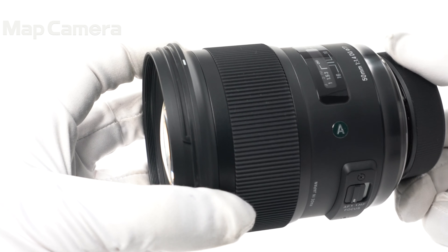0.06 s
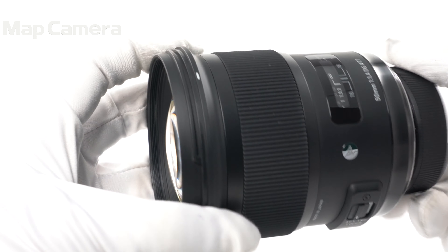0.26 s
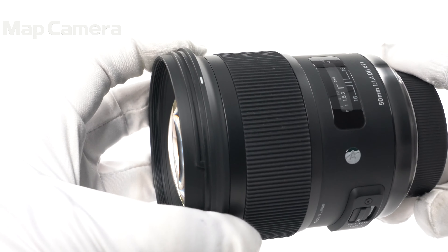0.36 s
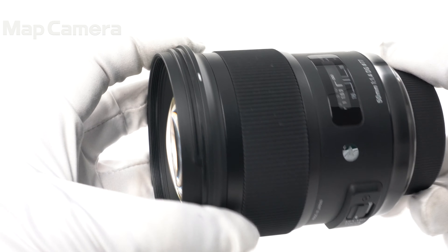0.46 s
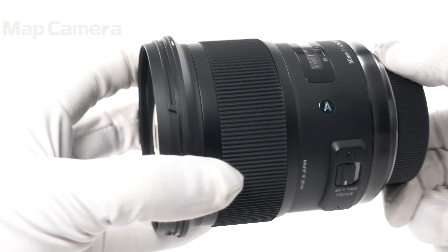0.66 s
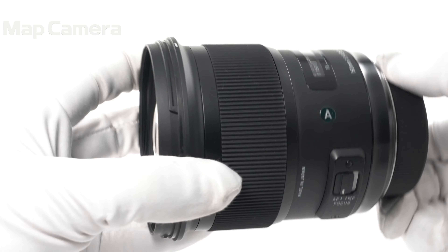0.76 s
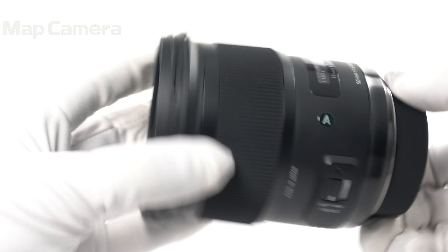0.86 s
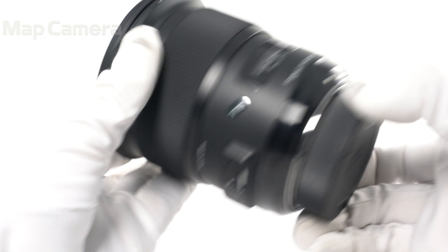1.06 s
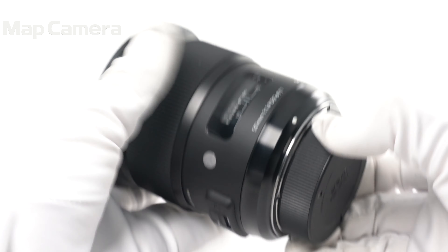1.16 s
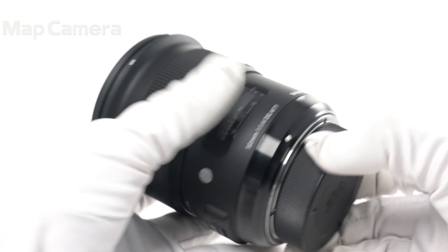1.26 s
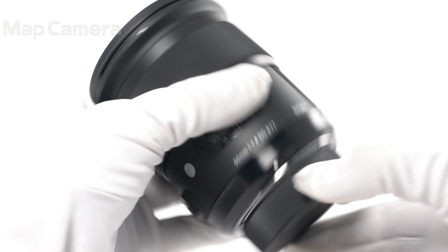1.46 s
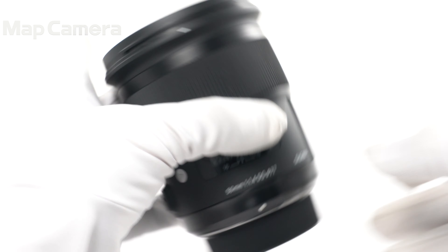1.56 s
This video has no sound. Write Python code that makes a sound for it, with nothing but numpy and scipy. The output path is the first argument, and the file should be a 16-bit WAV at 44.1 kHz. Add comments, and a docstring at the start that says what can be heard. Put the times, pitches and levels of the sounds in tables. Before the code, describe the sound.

Hard plastic clack of a cap on a camera lens, followed by faint sliding and cloth brushing

```python
"""Turning a camera lens over in gloved hands

Close by in a quiet, dry room, a plastic part, probably the rear cap, scrapes round, snaps over its catch,
knocks into its seat and slides on to a soft stop: decaying modes make the impacts, stick-slip noise the slides.
Cotton gloves brush the barrel (uneven filtered noise) and the hands bump it dully (damped low sines).
Underneath lie a low room rumble, a wavering hum and a thin electrical whine."""
import sys
import numpy as np
from scipy import signal
from scipy.fft import rfft, irfft, next_fast_len
from scipy.io import wavfile
from scipy.ndimage import uniform_filter1d, map_coordinates

SR = 44100
rng = np.random.default_rng(int(sys.argv[2]) if len(sys.argv) > 2 else 0)


def transcribe(u):
    """Save the signal u as a 16-bit wav file named by the first command-line argument.

    u: samples, shape (n,) or (channels, n), limited to [-1, 1]; the rate is SR.
    q: integer samples, one column per channel.
    """
    v = np.clip(np.atleast_2d(u).T, -1, 1)
    q = np.round(v * 32767).astype(np.int16)
    wavfile.write(sys.argv[1], SR, q)


N = 70560

# Modes of the lens and cap, with relative levels for three places of impact:
# (frequency [Hz], decay time T60 [s], level at catch [dB], level at seat [dB], level at stop [dB])
LENS_MODES = [(269, 0.05, -26, -10, -18), (543, 0.022, -30, -5.5, -19), (964, 0.067, -21, -26, -2.5),
              (1176, 0.055, -20, -5, -10), (1557, 0.036, -7, -2, -10), (1835, 0.019, 2.5, -1, -14),
              (2379, 0.04, -10.5, -3.5, 0), (2744, 0.041, -0.5, -10, -7), (2966, 0.023, -12.5, 1, -22),
              (3150, 0.055, -13, -9.5, -6), (4363, 0.028, -1.5, -23, -23), (4802, 0.028, -0.5, 1, -9),
              (6200, .025, -4, -6.5, -6.5), (8480, 0.027, -3, -9, -18)]
# Spectrum of the dense wash of small modes:
# (frequency [Hz], gain at catch [dB], gain at seat [dB], gain at stop [dB])
WASH_SPECTRA = [(119.9, -14.5, -3.5, -11), (825, -13.5, -8, -4.5), (1270, -20.5, -0.5, -9.5),
                (1680, 7, -15, -2), (2610, -1.5, 10, 6), (3420, -8, -0.5, -7), (4410, 4, -2.5, -8),
                (8640, -4, -10, -11), (10550, -12, -9, -18.5), (15900, -22, -20, -30)]
# Bare pressure pulse of a contact, relative: level [dB] at the catch, the seat and the stop
PUSH_LEVELS = [4, 12, 7.5]
# Snaps at the catch: (time [s], level [dB], bass tilt [dB/octave], treble tilt [dB/octave])
CATCH_SNAPS = [(.1583, -41, -6, -1.5), (.1895, -38, 1, -5.5), (.1958, -33.5, -15, 3.5),
               (.2298, -16.5, -18, 0.5), (.2311, -6, -1, -4), (.2378, -16.5, -2.5, -8),
               (.2617, -31.5, 4.5, 8), (.2995, -40.5, -4, 11.5), (.3045, -27, 0.5, -5.5)]
# Knocks into the seat: (time [s], level [dB], bass tilt [dB/octave], treble tilt [dB/octave])
SEAT_KNOCKS = [(.3065, -28.5, -17, 2), (.3187, -22, 0, -9.5), (.3226, -15, -2, 2.5),
               (.3256, -8.5, 0.5, 0.5), (.3295, -17.5, -0.5, 4)]
# Soft taps that ring as at the stop: (time [s], level [dB], bass tilt [dB/octave], treble tilt [dB/octave])
STOP_TAPS = [(.675, -26, 1, -1.5), (.6788, -27, -0.5, 0.5), (.6835, -32.5, 1.5, 3), (.764, -49, -4, -2),
             (.897, -49, 6, 2)]
# Side signal of the snaps and knocks relative to their mid: (frequency [Hz], level [dB])
CLICK_WIDTH = [(3000, -53), (5500, -31), (7500, -15.5), (10000, -21)]
# First turn, scraping by the catch: (time [s], level [dB])
SCRAPE_LEVEL = [(.03, -81), (.075, -59), (.135, -70), (.17, -41.5), (.18, -40), (.197, -31), (.209, -44),
                (.223, -40.5), (.24, -46), (.26, -46.5), (.275, -51), (.282, -43), (.295, -53.5),
                (.306, -32), (.316, -47), (.365, -80)]
# Second turn, sliding to the stop: (time [s], level [dB])
SLIDE_LEVEL = [(.46, -94), (.49, -51), (.53, -53), (.58, -53), (.62, -47.5), (.67, -54.5), (.695, -50),
               (.715, -82.5)]
# Scuff as the second turn breaks loose: (time [s], level [dB])
SCUFF_LEVEL = [(.48, -73), (.488, -43.5), (.507, -43.5), (.53, -71)]
# Resonances excited by the scrape: (frequency [Hz], width [Hz], gain [dB])
SCRAPE_RESONANCES = [(1480, 2500, -9), (2700, 280, -9), (4830, 330, 2), (6450, 1300, -3),
                     (7860, 1060, -7.5)]
# Resonances excited by the slide: (frequency [Hz], width [Hz], gain [dB])
SLIDE_RESONANCES = [(1540, 510, -3.5), (2000, 690, -6), (2425, 195, 3.5), (2680, 280, 0)]
# Resonances excited by the scuff: (frequency [Hz], width [Hz], gain [dB])
SCUFF_RESONANCES = [(1080, 380, -4.5), (1550, 280, 0), (2490, 560, -8.5)]
# Hiss of the sliding contact itself: (frequency [Hz], gain [dB])
CONTACT_HISS = [(300, -12.5), (2000, -6), (3500, 0.5), (6500, -1.5), (9000, -2.5), (15000, -14)]
# Gloves brushing the barrel: (time [s], level [dB])
BRUSH_LEVEL = [(.68, -83.5), (.72, -66.5), (.766, -53.5), (.796, -73), (.814, -58), (.842, -64.5),
               (.878, -49.5), (1.0, -47.5), (1.13, -48.5), (1.16, -45.5), (1.206, -52.5), (1.25, -51.5),
               (1.35, -54), (1.42, -51.5), (1.512, -44), (1.575, -49.5), (1.6, -50.5)]
# Colour of cotton on the barrel: (frequency [Hz], gain [dB])
CLOTH_SPECTRUM = [(180, -34), (300, -21.5), (590, -1.5), (1220, -3.5), (1810, -2), (3280, -3), (6900, -8),
                  (15500, -19)]
# Resonance of the brushed barrel: (frequency [Hz], width [Hz], gain [dB])
BARREL_RESONANCE = [(1835, 99, 0)]
# A thumb stroking the ribbed focus ring: (time [s], level [dB])
RIBS_LEVEL = [(.9, -73), (.97, -53), (1.1, -51.5), (1.155, -55), (1.19, -81)]
# Resonances of the ribs: (frequency [Hz], width [Hz], gain [dB])
RIBS_RESONANCES = [(3500, 1400, 0), (6400, 1200, -1)]
# Treble of the cloth: (time [s], level [dB])
FIZZ_LEVEL = [(.85, -73), (.88, -54), (1.13, -54.5), (1.155, -44.5), (1.185, -48.5), (1.21, -57),
              (1.42, -70), (1.57, -60), (1.6, -44)]
# Colour of that treble: (frequency [Hz], gain [dB])
FIZZ_SPECTRUM = [(2000, -34), (7000, 3), (10500, 3.5), (15500, -7)]
# Soft bumps of the hands: (time [s], level [dB], frequency [Hz])
HAND_BUMPS = [(0.487, -32, 216), (0.514, -31.5, 88), (0.566, -37, 123), (.71, -33, 78), (1.178, -30, 66),
              (1.237, -33, 245), (1.258, -34, 79), (1.296, -36.5, 176), (1.311, -30, 225),
              (1.393, -33.5, 200), (1.406, -30.5, 166), (1.428, -39, 61.7)]
# Dull rub of the grip: (time [s], level [dB])
GRIP_LEVEL = [(0, -59), (.13, -62), (.19, -46.5), (.3, -55), (.47, -63), (.52, -44.5), (.57, -32.5),
              (.625, -41.5), (.67, -60), (.84, -69), (1.14, -54.5), (1.6, -53)]
# Colour of the grip: (frequency [Hz], gain [dB])
GRIP_SPECTRUM = [(25, -27.5), (70, 3.5), (130, -3.5), (220, -7.5), (350, -6.5), (560, -14.5), (900, -28),
                 (2000, -60)]
# Colour of the room noise: (frequency [Hz], gain [dB])
ROOM_SPECTRUM = [(18, -14), (30, -8), (39, 6.5), (55, 0), (90, 0), (150, -6.5), (300, -9.5), (600, -22),
                 (1000, -26.5), (2500, -30), (15500, -46)]

PIVOT_HZ = 3580  # the tilts turn about this frequency
# wash and crack: levels relative to the modes, and decay times
WASH_DB, WASH_T60_S, CRACK_DB, CRACK_T60_S = -1, 0.043, 3, 0.0088
ATTACK_S = 0.00017
BUMP_CYCLES, BUMP_RISE_S = 8.8, 0.0025  # cycles for a 60 dB decay; time constant of the rise
ROOM_DB, HUM_HZ, HUM_DB, WHINE_HZ, WHINE_DB = -49.5, 78, -50, 13765, -75.5  # levels are rms
TOP_HZ, CEILING = 16100, .88  # band limit; clipping amplitude


def ring(place):
    """Modal impact at the catch (0), seat (1) or stop (2): a pulse excites modes, a wash and a crack."""
    t = np.arange(SR // 8) / SR
    modes = np.zeros(len(t))
    for k, (hz, t60, *levels) in enumerate(LENS_MODES):
        decay = amp(levels[place] + rng.normal(0, 1) - 60 * t / t60)
        modes += decay * np.sin(2 * np.pi * hz * t) * (-1) ** k  # alternating polarity
    spectrum = [(hz, gains[place]) for hz, *gains in WASH_SPECTRA]
    wash_decay = amp(WASH_DB - 60 * t / WASH_T60_S)
    crack_decay = amp(CRACK_DB - 60 * t / CRACK_T60_S)
    wash = noise(spectrum, size=len(t)) * (wash_decay + crack_decay)
    push = coloured(1.0 * (t == 0), lambda hz: along(spectrum, hz))
    push *= amp(PUSH_LEVELS[place]) / np.abs(push).max()
    return ((modes + wash) * (1 - np.exp(-t / ATTACK_S)) + push) / 2


def clicks(table, place):
    """Impact excitation: each contact rings the lens, and its hardness tilts the bass and the treble."""
    out = np.zeros(N + SR)
    for start, db, bass_db, treble_db in table:
        def tilt(hz):
            octaves = np.clip(np.log2((hz + 1) / PIVOT_HZ), -3, 1.5)
            return np.where(octaves < 0, -bass_db, treble_db) * octaves

        hit = coloured(ring(place), tilt)
        out[round(start * SR):][:len(hit)] += amp(db) * hit
    return out[:N]


def friction(curve, resonances, grain_db, hiss_db):
    """Stick-slip friction: uneven slips of plastic on the mount ring the parts and hiss at the contact."""
    releases = slips(grain_db)
    ringing = patchy(resonant(releases, resonances), depth_db=3.5)
    hiss = unit(coloured(releases, lambda hz: along(CONTACT_HISS, hz)))
    return level(curve) * (ringing + amp(hiss_db) * hiss)


def scuff():
    """Break-away friction: very uneven slips ring the cap as the second turn breaks loose."""
    return level(SCUFF_LEVEL) * resonant(slips(grain_db=7), SCUFF_RESONANCES)


def gloves():
    """Fibre friction: many small slips of cotton brush the faintly ringing barrel, stroke ribs and fizz."""
    cloth = coloured(slips(grain_db=1.5), lambda hz: along(CLOTH_SPECTRUM, hz))
    cloth = patchy(cloth, depth_db=0.95)
    barrel = resonant(rng.standard_normal(N), BARREL_RESONANCE)
    ribs = patchy(resonant(slips(grain_db=2), RIBS_RESONANCES), depth_db=3.0)
    fizz = unit(coloured(slips(grain_db=1.0), lambda hz: along(FIZZ_SPECTRUM, hz)))
    brush = level(BRUSH_LEVEL) * (cloth + amp(-14.0) * barrel)
    return brush + level(RIBS_LEVEL) * ribs + level(FIZZ_LEVEL) * fizz


def handling():
    """Damped oscillation: the hands bump the heavy lens, and the grip rubs as dull noise."""
    bumps = np.zeros(N + SR)
    t = np.arange(SR // 5) / SR
    for start, db, hz in HAND_BUMPS:
        envelope = amp(db - 60 * t * hz / BUMP_CYCLES) * (1 - np.exp(-t / BUMP_RISE_S))
        bumps[round(start * SR):][:len(t)] += envelope * np.sin(2 * np.pi * hz * t)
    return bumps[:N] + level(GRIP_LEVEL) * noise(GRIP_SPECTRUM)


def room():
    """Stationary background: rumble and faint hiss, a hum wavering in phase and level, a steady whine."""
    t = np.arange(N) / SR
    hum = np.sin(2 * np.pi * HUM_HZ * t + 1.56 * wobble(9.46))  # phase wander in radians
    hum *= amp(2.3 * wobble(8.15))
    whine = np.sin(2 * np.pi * WHINE_HZ * t)
    return amp(ROOM_DB) * noise(ROOM_SPECTRUM) + amp(HUM_DB) * unit(hum) + amp(WHINE_DB) * unit(whine)


def slips(grain_db):
    """Stick-slip: noise whose fast random level stands for tiny releases of uneven size."""
    return rng.standard_normal(N) * amp(grain_db * wobble(1500))


def resonant(x, resonances):
    """Forced resonance: x through parallel squared band-pass responses, scaled to rms 1."""
    m = next_fast_len(N + SR // 4)
    f = np.fft.rfftfreq(m, 1 / SR)
    body = np.zeros(len(f), complex)
    for hz, width, db in resonances:
        damping = 1j * f * width
        body += amp(db) * (damping / (hz * hz - f * f + damping)) ** 2
    return unit(irfft(rfft(x, m) * body, m)[:N])


def patchy(x, depth_db):
    """Shifting contact: the points of contact move, each lifting its own band for a moment; rms 1."""
    z = signal.stft(x, nperseg=256)[2]
    field = rng.standard_normal(z.shape)
    field = uniform_filter1d(field, size=8, axis=0)  # smooth over frequency
    field = uniform_filter1d(field, size=12, axis=1)  # smooth over time
    return unit(signal.istft(z * amp(depth_db * unit(field)), nperseg=256)[1][:N])


def noise(spectrum, size=N):
    """Spectral shaping: white noise filtered to the given spectrum, at rms 1."""
    return unit(coloured(rng.standard_normal(size), lambda hz: along(spectrum, hz)))


def coloured(x, gain_db):
    """Minimum-phase filtering: a folded cepstrum makes the gain in dB over frequency causal."""
    m = 2 * next_fast_len(len(x))
    cepstrum = irfft(np.log(amp(gain_db(np.fft.rfftfreq(m, 1 / SR)))), m)
    cepstrum[1:m // 2] *= 2
    cepstrum[m // 2 + 1:] = 0
    return irfft(rfft(x, m) * np.exp(rfft(cepstrum)), m)[:len(x)]


def wobble(rate):
    """Random modulation: a smooth curve through normal random knots, rate of them a second."""
    knots = rng.standard_normal(int(N * rate / SR) + 4)
    return map_coordinates(knots, [np.arange(N) * rate / SR])


def level(points):
    """Envelope: gain per sample, linear in dB between (time [s], level [dB]) points."""
    return amp(np.interp(np.arange(N) / SR, *np.transpose(points)))


def along(points, hz):
    """Spectral interpolation: (frequency [Hz], value) points joined on a log frequency axis."""
    f, v = np.transpose(points)
    return np.interp(np.log(hz + 1), np.log(f + 1), v)


def unit(x):
    """Power normalisation: scale to rms 1."""
    return x / np.sqrt(np.mean(x ** 2) + 1e-20)


def amp(db):
    """Decibel law: level to amplitude gain."""
    return 10 ** (np.asarray(db) / 20)


def scene():
    """Superposition: all sources are central; a quadrature side signal spreads the snaps and knocks."""
    loud = clicks(CATCH_SNAPS, place=0) + clicks(SEAT_KNOCKS, place=1)
    turns = friction(SCRAPE_LEVEL, SCRAPE_RESONANCES, grain_db=4.5, hiss_db=-16.5)
    turns += friction(SLIDE_LEVEL, SLIDE_RESONANCES, grain_db=1.0, hiss_db=-0.5)
    turns += scuff()
    mid = loud + turns + clicks(STOP_TAPS, place=2) + gloves() + handling() + room()
    width = amp(along(CLICK_WIDTH, np.fft.rfftfreq(N, 1 / SR)))
    side = irfft(1j * rfft(loud) * width, N)  # 1j turns the phase by 90 degrees
    return np.array([mid + side, mid - side])


def record(dry):
    """Clipping and band limiting: the recorder clips the sharpest peaks, then cuts all above its limit."""
    m = next_fast_len(N + SR // 2)
    clipped = np.clip(dry, -CEILING, CEILING)
    passband = np.fft.rfftfreq(m, 1 / SR) < TOP_HZ
    return irfft(rfft(clipped, m) * passband, m)[:, :N]


dry = scene()
out = record(dry)
transcribe(out)
```